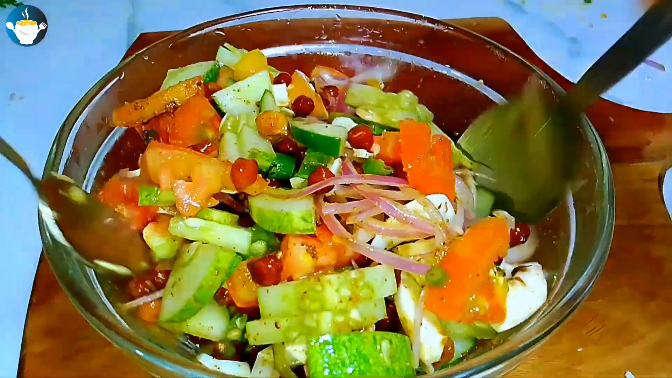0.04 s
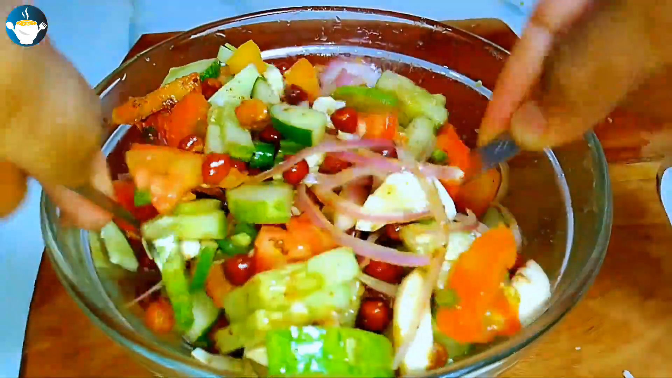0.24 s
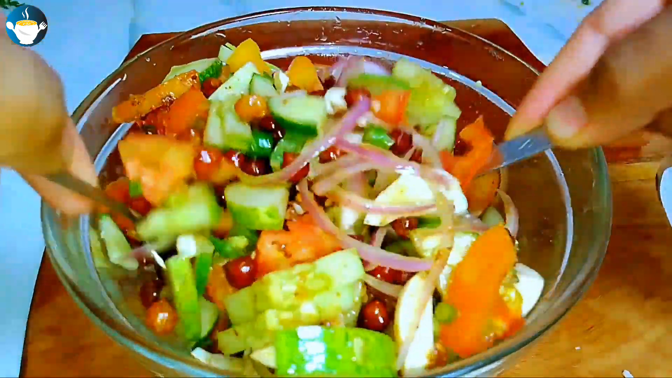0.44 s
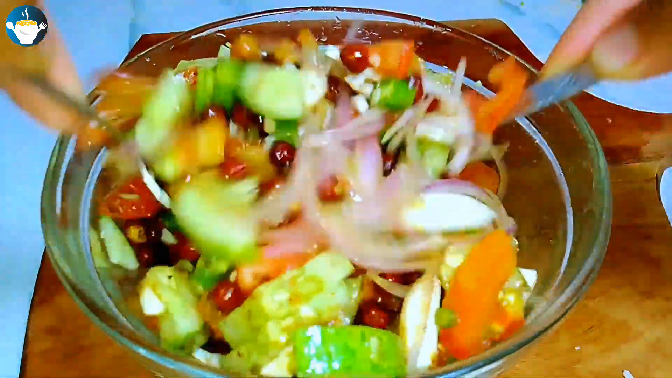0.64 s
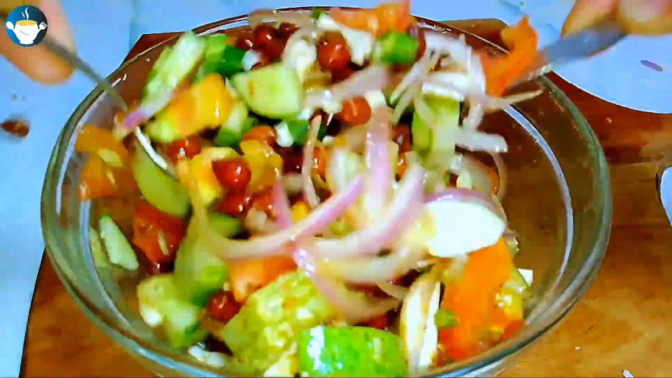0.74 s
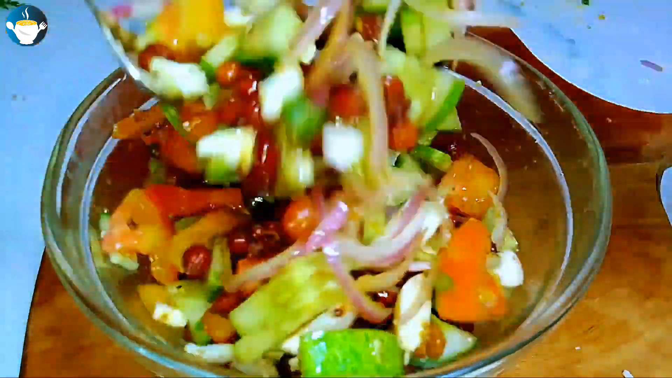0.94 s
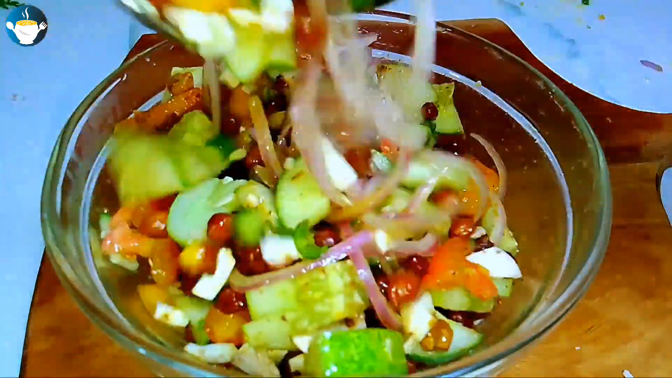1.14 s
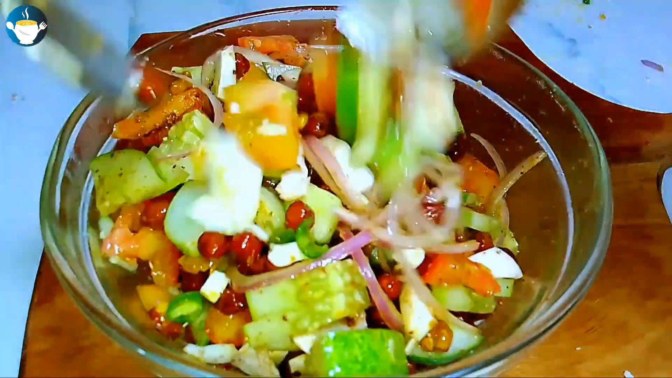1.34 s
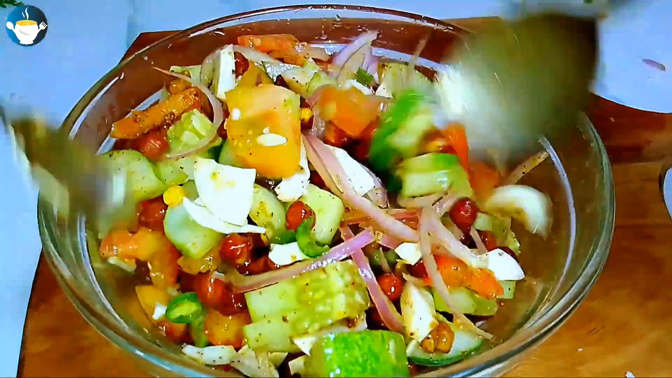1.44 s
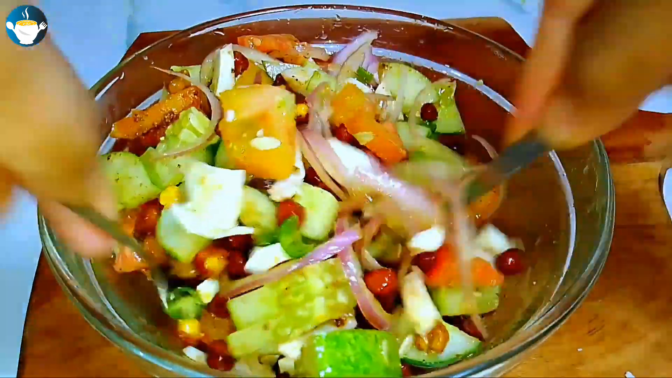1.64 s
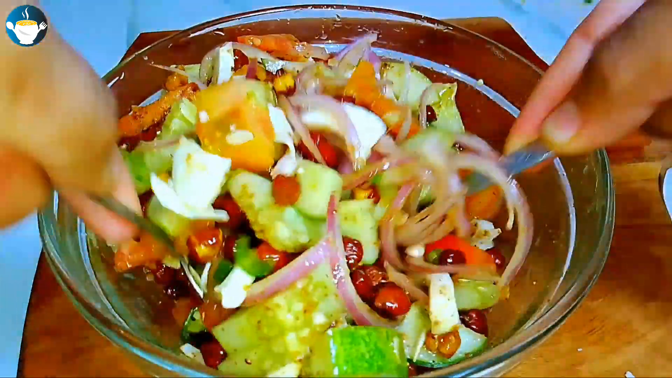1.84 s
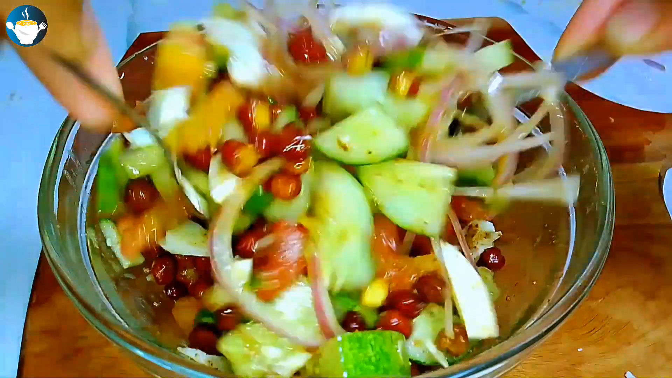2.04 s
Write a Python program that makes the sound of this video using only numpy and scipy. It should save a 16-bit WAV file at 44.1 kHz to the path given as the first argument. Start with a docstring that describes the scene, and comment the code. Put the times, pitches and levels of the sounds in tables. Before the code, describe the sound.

Close to the microphone, two metal spoons clink sharply against a glass salad bowl, ringing briefly in a small kitchen. Faint pats of falling vegetables and one dull knock of the spoons follow, before another bright clink.

```python
"""A small, hard-walled kitchen, with a narrow-band microphone close to a glass bowl of chopped salad.
Over faint hiss, two metal spoons dig in and clink on the glass, bumping the bowl on its wooden board.
The vegetables damp the glass quickly, but the room rings on. Two pieces drop back, the spoons knock
together once, and two more pieces fall. Last, the spoons dig in and clink again."""
import sys
import numpy as np
from scipy import signal
from scipy.fft import irfft
from scipy.io import wavfile

SR = 44100
rng = np.random.default_rng(int(sys.argv[2]) if len(sys.argv) > 2 else 0)


def master_out(mix):
    """Clip the mix to full scale and print it as 16-bit PCM to the path in sys.argv[1]."""
    frames = np.transpose(np.atleast_2d(mix))
    ceiling = np.clip(frames, -1, 1)
    pcm = np.round(ceiling * 32767).astype(np.int16)
    wavfile.write(sys.argv[1], SR, pcm)


N = 92610


def amp(db):
    """Decibels to gain."""
    return 10 ** (np.asarray(db) / 20)


def unit_rms(x):
    """Scales to rms 1."""
    return x / np.sqrt(np.mean(x ** 2) + 1e-20)


def curve_at(points, hz):
    """Reads a table on a log-frequency axis."""
    points_hz, values = np.transpose(points)
    return np.interp(np.log(hz + 1), np.log(points_hz + 1), values)


def add(mix, start_s, sound):
    """Mixes a sound in at start_s."""
    part = mix[round(start_s * SR):][:len(sound)]
    part += sound[:len(part)]


def noise(colour, size):
    """Noise of rms 1 with the given spectrum."""
    hz = np.fft.rfftfreq(size, 1 / SR)
    phases = np.exp(2j * np.pi * rng.random(len(hz)))
    return unit_rms(irfft(amp(curve_at(colour, hz)) * phases, size))


# spectrum of the background: frequency_hz, relative_db
HISS_COLOUR = [(20, -3.5), (35, -3), (70, -5.5), (110, 1.5), (160, -9.5), (230, -3), (400, -5), (700, -5),
               (1300, -7), (2000, -4), (2700, -3), (3450, 3.5), (4100, -4.5), (5000, -13), (6000, -19),
               (7200, -26.5)]

def hiss(level_db=-57):
    """The faint, steady noise floor of the place."""
    return amp(level_db) * noise(HISS_COLOUR, N)


def contact(colour, t60_s, rise_s=0.00064):
    """The brief burst of noise as two things meet."""
    t = np.arange(SR) / SR
    envelope = (1 - np.exp(-t / rise_s)) * amp(-60 * t / t60_s)
    return unit_rms(noise(colour, len(t)) * envelope) * np.sqrt(np.mean(envelope ** 2))


# modes of a spoon: pitch_hz, relative_db, t60_s
SPOON_MODES = [(693, -14.5, 0.11), (1249, -17.5, 0.14), (1690, -27.5, 0.065), (2120, -5, 0.062),
               (3030, -8.5, .04), (3390, 17, .04), (3520, -11, .09), (3940, -25, .05), (4490, 0, 0.16),
               (4720, 0, .07), (4870, -10.5, 0.17)]

def spoon_ring(build_s=0.0011):
    """The short ring of a hand-held metal spoon."""
    t, out = np.arange(SR) / SR, np.zeros(SR)
    for pitch_hz, db, t60_s in SPOON_MODES:
        out += amp(db - 60 * t / t60_s) * np.sin(2 * np.pi * (pitch_hz * t + rng.random()))
    return out * (1 - np.exp(-t / build_s))


# modes of the bowl, each a close pair: pitch_hz, twin_offset_hz, t60_s
BOWL_MODES = [(880, 118, .07), (1799, 45, .055), (3128, 72, .036), (4878, -42, .075), (6838, 20, .085)]

def bowl_ring(modes_db, twin_gain=0.52, sustain_db=-41, sustain_t60_s=1, build_s=0.0011):
    """The glass rings in beating pairs of modes; a faint share outlasts the salad's damping."""
    t, out = np.arange(SR) / SR, np.zeros(SR)
    for (pitch_hz, offset_hz, t60_s), db in zip(BOWL_MODES, modes_db):
        cycles = pitch_hz * t + rng.random()
        main = np.sin(2 * np.pi * cycles)
        twin = np.sin(2 * np.pi * (cycles + offset_hz * t))
        damped = (main + twin_gain * twin) / (1 + twin_gain) * amp(-60 * t / t60_s)
        sustained = main * amp(sustain_db - 60 * t / sustain_t60_s)
        out += amp(db) * (damped + sustained)
    return out * (1 - np.exp(-t / build_s))  # the ring spreads round the rim


# spectrum of metal meeting glass: frequency_hz, relative_db
CLACK_COLOUR = [(100, -48), (300, -43), (520, -34.5), (780, -8), (1250, -10), (1750, -2), (2500, -4.5),
                (3300, -1), (4000, 0.5), (4700, -2.5), (5500, -10.5), (6300, -15), (7200, -26.5)]
# spoon strikes on the glass, the third a broadband skid: start_s, clack_db, bowl_mode1_db ... bowl_mode5_db
CLINK_HITS = [(0.2335, -27.5, -35.5, -57, -49, -18, -30.5), (0.2416, -11.5, -26, -18, 0, -12.5, -30),
              (0.2987, -29.5, -47.5, -45, -34.5, -39, -52.5), (1.7305, -25, -36, -27.5, -26, -32.5, -38),
              (1.7512, -13, -30.5, -20.5, -6, -10, -28)]

def clinks(spoon_db=-23):
    """Spoons strike the glass close to the microphone, and once skid on it: a clack, then both ring."""
    out = np.zeros(N)
    for start_s, clack_db, *modes_db in CLINK_HITS:
        strike = contact(CLACK_COLOUR, t60_s=0.023) + amp(spoon_db) * spoon_ring()
        add(out, start_s, amp(clack_db) * strike + bowl_ring(modes_db))
    return out


# decay of the kitchen: frequency_hz, t60_s
ROOM_DECAY = [(200, 0.17), (800, 1), (1800, 0.81), (3200, 0.53), (4800, 0.67), (7000, 0.47)]

def kitchen(direct, early_db=-5, first_echo_s=0.0048, early_t60_s=0.078, tail_db=-8, build_s=0.039):
    """Quick reflections from the nearby counter and walls, then a diffuse tail that builds up."""
    t = np.arange(SR) / SR
    early, tail = rng.standard_normal((2, SR))
    early = early * (t > first_echo_s) * amp(-60 * t / early_t60_s)
    hz, frame_s, spectra = signal.stft(tail, SR, nperseg=256)
    decay = amp(-60 * frame_s / curve_at(ROOM_DECAY, hz)[:, None])
    tail = signal.istft(spectra * decay, SR, nperseg=256)[1][:SR]
    tail *= np.minimum(t / build_s, 1)
    response = amp(early_db) * early / np.linalg.norm(early) + amp(tail_db) * tail / np.linalg.norm(tail)
    return signal.fftconvolve(direct, response)[:N]


# bowl against board: start_s, level_db
BOARD_HITS = [(0.2395, -56)]

def board_thuds(pitch_hz=379, t60_s=0.52, push_db=-2, push_peak_s=0.00077):
    """The first blow presses the bowl on the wooden board: a low push and a short note."""
    t, out = np.arange(SR) / SR, np.zeros(N)
    note = np.sin(2 * np.pi * pitch_hz * t) * amp(-60 * t / t60_s)
    push = amp(push_db) * t / push_peak_s * np.exp(1 - t / push_peak_s)
    for start_s, level_db in BOARD_HITS:
        add(out, start_s, amp(level_db) * (note + push))
    return out


# spectrum of vegetable meeting glass: frequency_hz, relative_db
PAT_COLOUR = [(100, -24.5), (450, -37.5), (700, 2.5), (1000, -4.5), (1500, -2), (2300, -15.5),
              (4000, -22.5), (7200, -41)]
# pieces landing: start_s, pat_db, bowl_mode1_db ... bowl_mode5_db
DROP_HITS = [(0.819, -61, -58, -69, -70, -58, -72.5), (0.967, -47, -63, -52, -36.5, -62.5, -86),
             (1.3503, -51, -55.5, -44.5, -57, -88, -91), (1.5110, -70, -58, -51.5, -67.5, -55, -69)]

def salad_drops():
    """Falling pieces pat the bowl and make it ring faintly."""
    out = np.zeros(N)
    for start_s, pat_db, *modes_db in DROP_HITS:
        add(out, start_s, amp(pat_db) * contact(PAT_COLOUR, t60_s=0.031) + bowl_ring(modes_db))
    return out


# spectrum of a cushioned knock: frequency_hz, relative_db
KNOCK_COLOUR = [(100, -38), (420, -32.5), (650, -10), (1200, -2.5), (1700, -4), (2300, 1.5), (3200, 0),
                (4100, -14.5), (5800, -34), (7200, -52)]
# spoon against spoon: start_s, level_db
KNOCK_HITS = [(1.1245, -31)]

def spoon_knocks(ring_db=-6.5, cutoff_hz=2440):
    """The loaded spoons meet above the bowl, their knock dulled by the salad."""
    out = np.zeros(N)
    lowpass = signal.butter(4, cutoff_hz, fs=SR, output="sos")
    for start_s, level_db in KNOCK_HITS:
        dull_ring = amp(ring_db) * signal.sosfilt(lowpass, spoon_ring())
        add(out, start_s, amp(level_db) * (contact(KNOCK_COLOUR, t60_s=0.036) + dull_ring))
    return out


def scene():
    """From beside the bowl: spoons and salad up front, the kitchen's echo and the hiss behind."""
    direct = clinks() + spoon_knocks() + salad_drops() + board_thuds()
    return (direct + kitchen(direct) + hiss())[None]


def record(dry, mic_edge_hz=7335, knee=0.63, headroom=0.16, band_limit_hz=15750):
    """One narrow-band microphone that rounds off peaks above its knee, then a band limit."""
    mic_band = signal.firwin(161, mic_edge_hz, window=("kaiser", 6), fs=SR)
    band_limit = signal.firwin(511, band_limit_hz, window=("kaiser", 9), fs=SR)
    narrow = signal.oaconvolve(dry, mic_band[None], "same")
    linear = np.clip(narrow, -knee, knee)
    rounded = linear + headroom * np.tanh((narrow - linear) / headroom)
    return signal.oaconvolve(rounded, band_limit[None], "same")


dry = scene()
out = record(dry)
master_out(out)
```